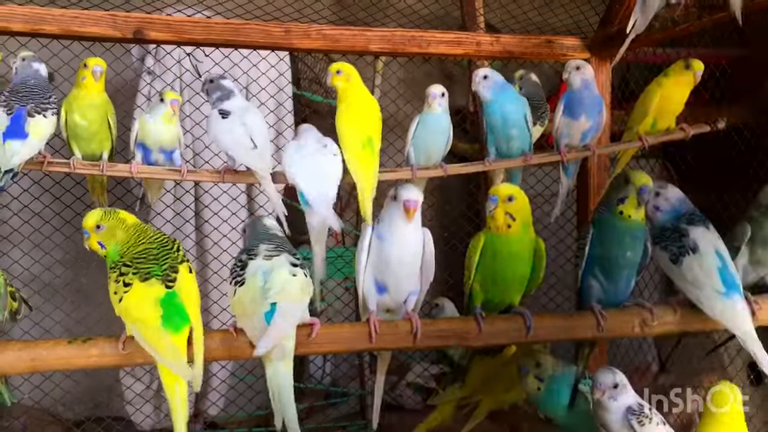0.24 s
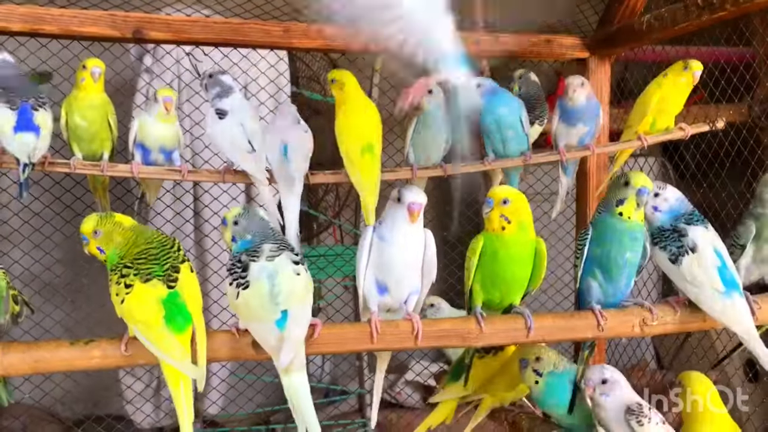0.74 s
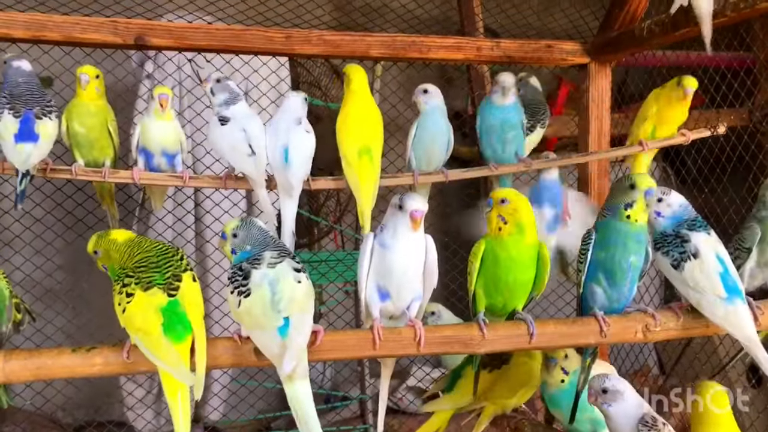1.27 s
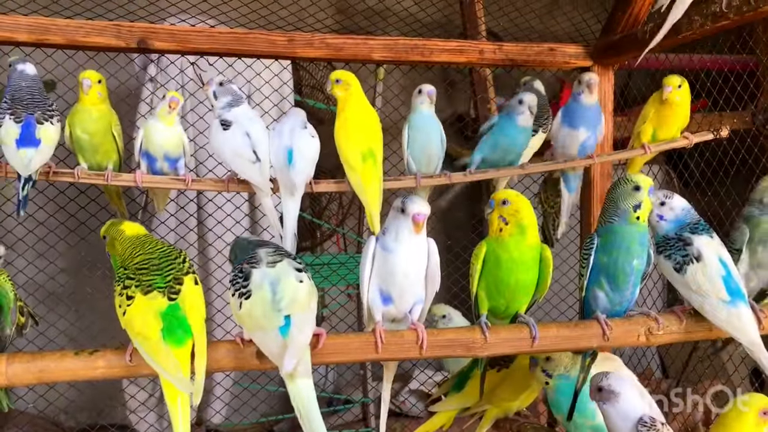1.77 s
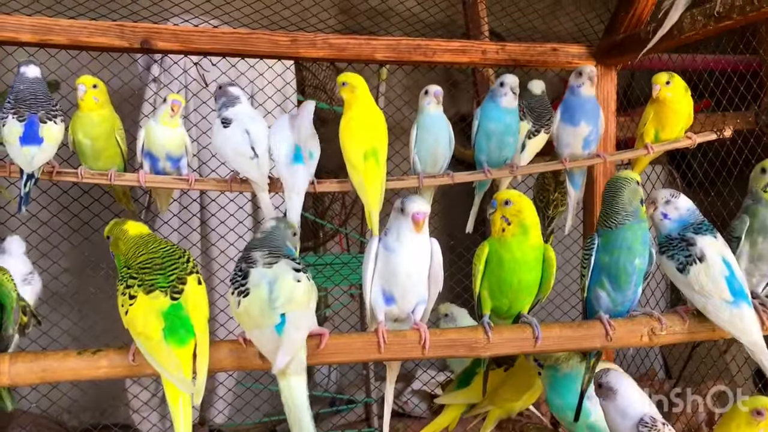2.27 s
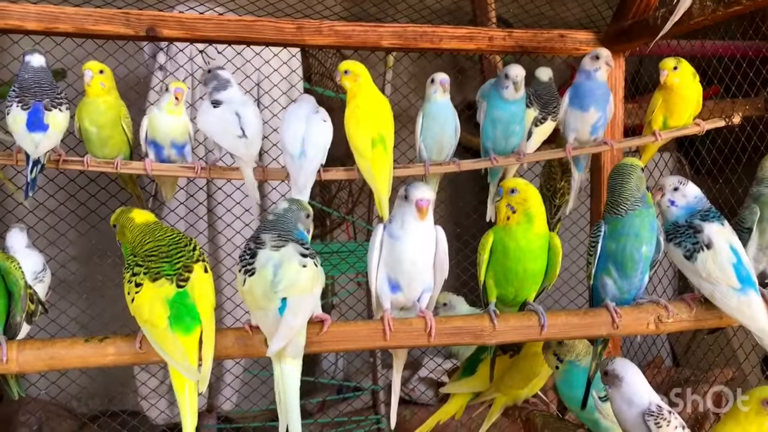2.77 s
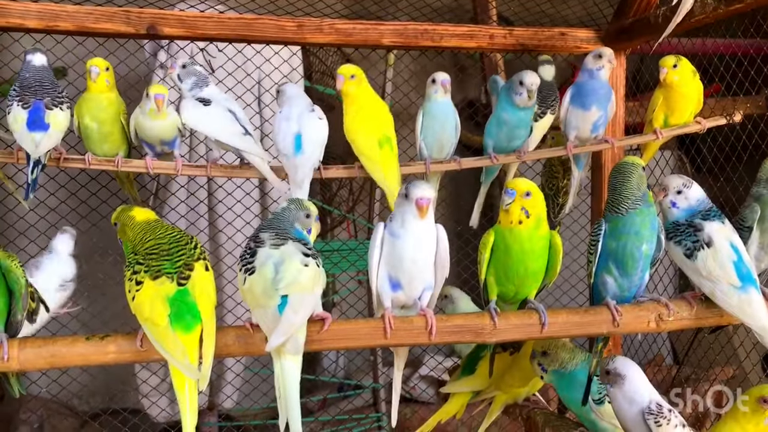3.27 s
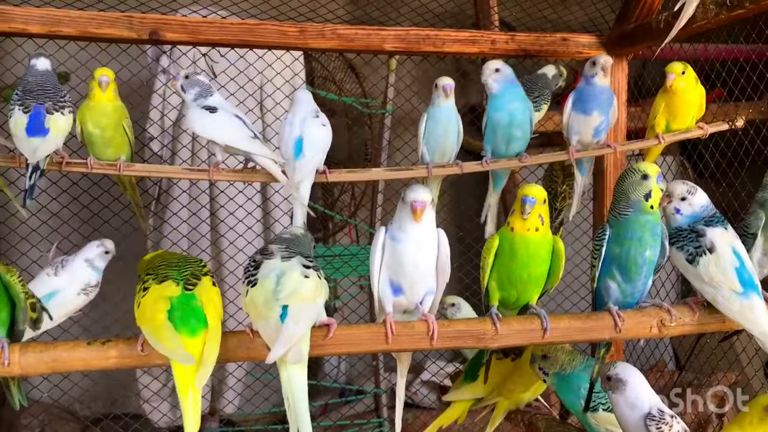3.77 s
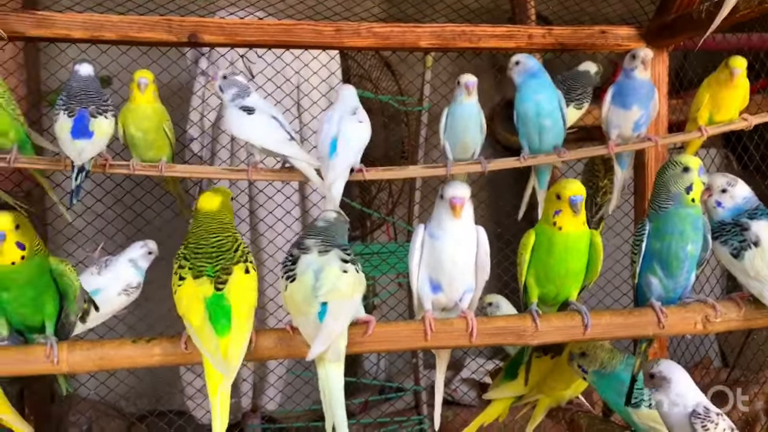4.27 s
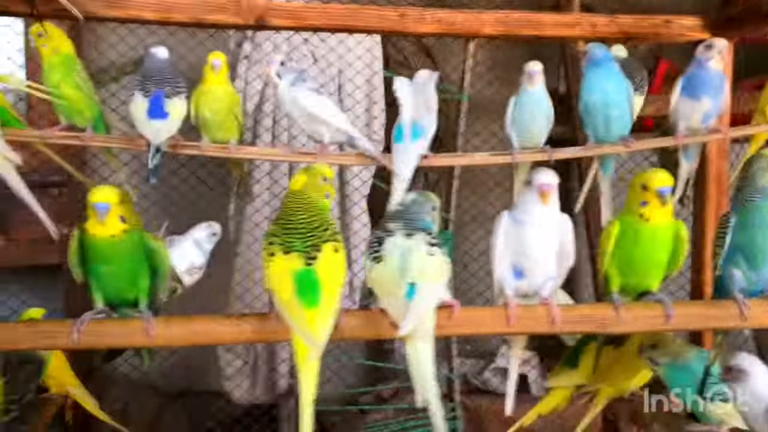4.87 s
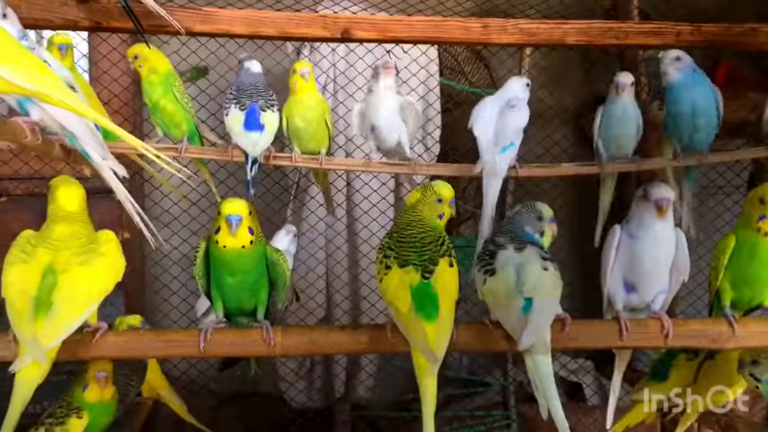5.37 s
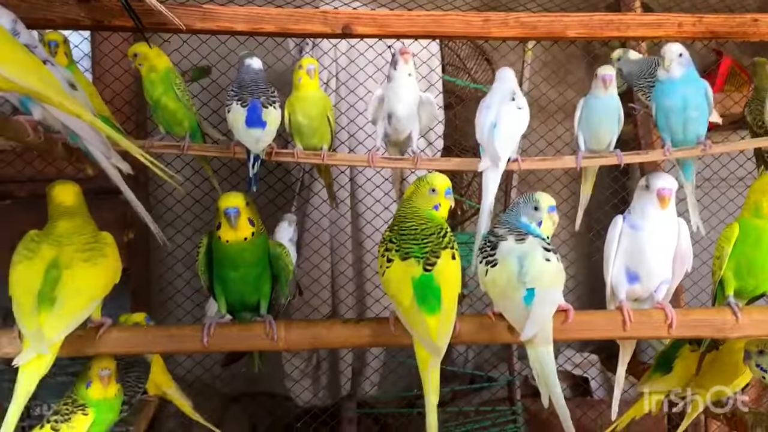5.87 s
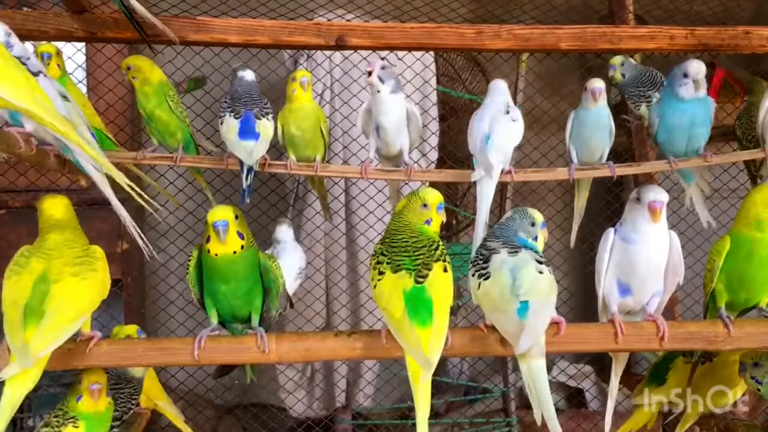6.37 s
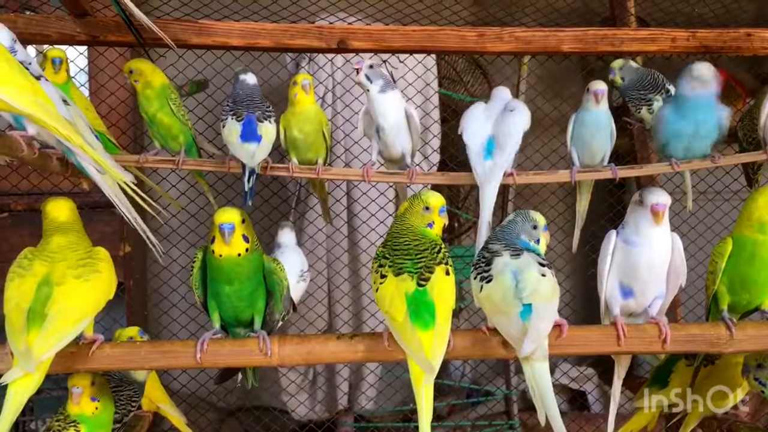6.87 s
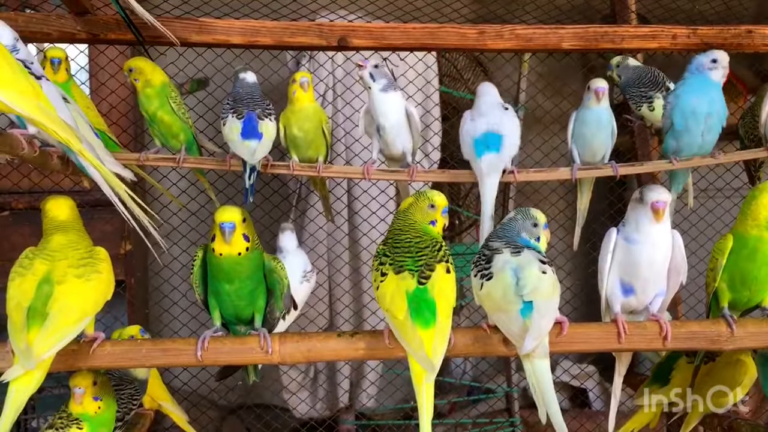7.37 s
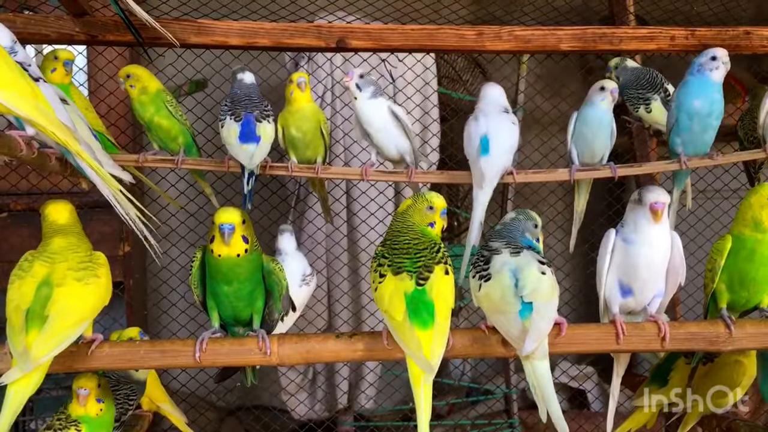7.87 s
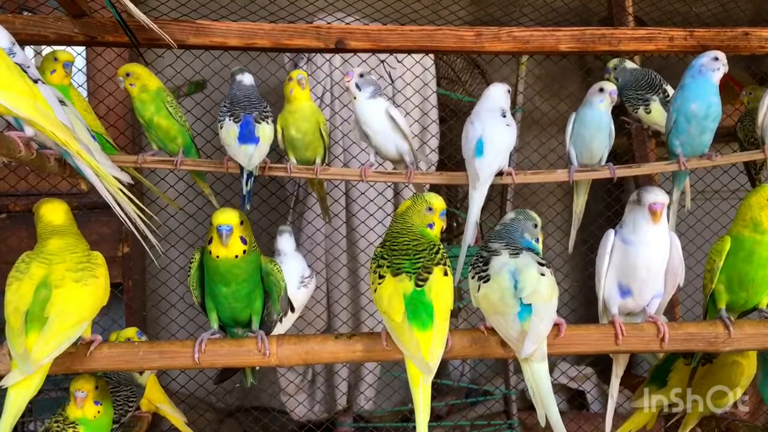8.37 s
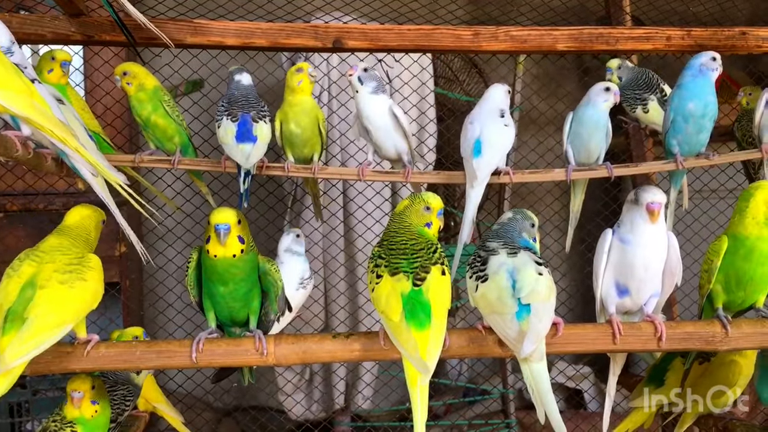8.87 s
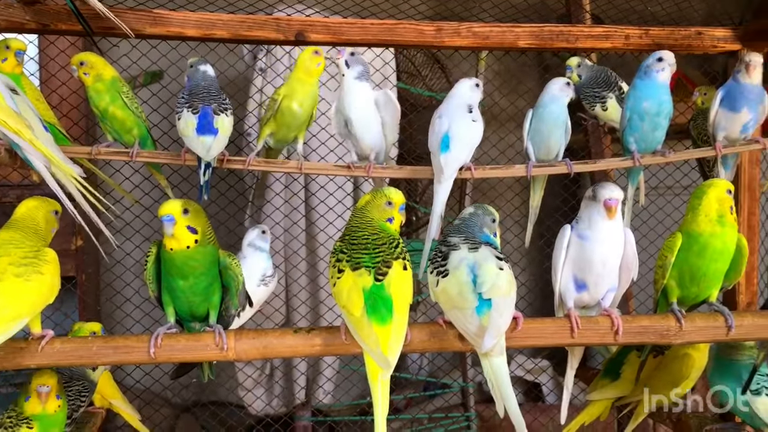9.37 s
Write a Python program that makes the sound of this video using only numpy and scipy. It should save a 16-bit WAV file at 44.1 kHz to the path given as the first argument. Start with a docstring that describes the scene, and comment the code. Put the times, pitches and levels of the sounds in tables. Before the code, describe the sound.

Close budgerigar warbles, a rasping squawk and rapid chatter mix with feathery wing flaps, strongest near five seconds, before the flock goes nearly still.

```python
"""Budgerigars in a small wire aviary, heard close up: warbled chirps, two whistles, a screech, scolding notes.
The voices are harmonics of gliding pitches, shaped by throat resonances and roughened by random shaking.
Wings are noise pulsed by the beat: pushed air, whoosh and feather swish. Claws and wing tips tick on wood
and wire as short noise bursts. The flock settles later on, while far birds chatter and coo faintly
over a low outdoor hum of coloured noise."""
import sys
import numpy as np
from scipy import signal
from scipy.fft import rfft, irfft, next_fast_len
from scipy.io import wavfile

SR = 44100
rng = np.random.default_rng(int(sys.argv[2]) if len(sys.argv) > 2 else 0)


def generate_wav(sig):
    """Save sig (samples, or channels by samples) to the path in sys.argv[1] as 16-bit PCM at SR."""
    pcm = np.round(np.clip(np.atleast_2d(sig).T, -1, 1) * 32767).astype(np.int16)
    wavfile.write(sys.argv[1], SR, pcm)


N = 424241
TIME = np.arange(N) / SR  # s

# throat and beak resonance of the scolds, also colouring the hiss of warbles: freq_hz, relative_db
SCOLD_RESONANCE = [(2800, -12), (4000, 4), (5800, 0.5), (7000, -8), (9000, -3.5), (10500, -26),
                   (15000, -31)]
# noise colour of feathers rubbing: freq_hz, relative_db (per Hz)
FEATHER_COLOUR = [(800, -26), (4600, -5.5), (6500, 3), (11000, -2), (15500, -16)]
# noise colour of hard little contacts: freq_hz, relative_db (per Hz)
CONTACT_COLOUR = [(900, -1.5), (6500, -3.5), (15500, -8)]
# bouts of wing beating: start_s, length_s, build_up_s, whoosh_db, swish_db, air_db
WING_BOUTS = [(-0.02, 0.67, .02, -47, -55, -41.5), (0.678, 0.54, 0.041, -45, -51, -42),
              (1.21, 0.36, 0.021, -51, -55.5, -47), (1.58, 1.04, .023, -57.5, -64.5, -60),
              (3.196, 0.43, 0.24, -59, -59, -53), (3.502, 0.47, 0.016, -43, -53.5, -39),
              (4.037, 0.065, 0.047, -45.5, -53.5, -65), (4.5, 0.28, 0.058, -51.5, -43, -50.5),
              (4.614, 0.075, 0.034, -38.5, -36, -34), (4.797, 0.27, .01, -36.5, -31, -39.5),
              (4.851, 0.28, .17, -39, -35, -37), (5.183, 1.09, .023, -53, -59, -49),
              (7.708, 0.12, .023, -55.5, -59, -47)]


def undb(db):
    """Decibels to gain."""
    return 10 ** (np.asarray(db) / 20)


def unit(x):
    """Scale to rms 1."""
    return x / np.sqrt(np.mean(x ** 2))


def response(points, hz):
    """Gain of a (Hz, dB) spectrum at the given frequencies, joined by lines over log frequency."""
    freq_hz, level_db = np.transpose(points)
    return undb(np.interp(np.log(np.maximum(hz, 1)), np.log(freq_hz), level_db))


def colour(x, points):
    """Filter by a (Hz, dB) spectrum and scale to rms 1."""
    size = next_fast_len(len(x))
    hz = np.arange(size // 2 + 1) * SR / size
    filtered = irfft(rfft(x, size) * response(points, hz), size)
    return unit(filtered[:len(x)])


def wander(t, rate):
    """Random values, rate a second, joined by lines; spread near 1."""
    knots = (t - t[0]) * rate
    values = rng.standard_normal(len(t) // 4 + 2)
    return np.sqrt(1.5) * np.interp(knots, np.arange(len(values)), values)


def span(start, end):
    """Sample times between two moments in seconds."""
    return np.arange(int(start * SR), int(end * SR)) / SR


def add(out, t, x):
    """Mix x in at its sample times, dropping what falls outside the scene."""
    i = np.rint(t * SR).astype(int)
    inside = (i >= 0) & (i < N)
    out[i[inside]] += x[inside]


def far_call(middle, length, hz, db, waver, grain_db=6, echo_s=0.09):
    """A wavering call, broken into syllables the more it wavers, trailed by its many reflections."""
    out = np.zeros(N)
    t = span(middle - length / 2, middle + length / 2)
    pitch = hz * (1 + waver * wander(t, 220))
    tone = np.sin(2 * np.pi * np.cumsum(pitch) / SR)
    syllables = undb(grain_db * min(waver / 0.15, 1) * wander(t, 59.2))
    call = tone * syllables * signal.windows.tukey(len(t), .5)
    age = span(0, 0.27)
    echoes = rng.standard_normal(len(age)) * np.exp(-age / echo_s)
    heard = signal.fftconvolve(call, echoes / np.linalg.norm(echoes))
    add(out, t[0] + np.arange(len(heard)) / SR, unit(heard) * undb(db) / 2)
    return out


def distance(hum_db=-54, swell_db=1.7):
    """Far birds over the outdoor hum, noise whose five bands from low to high swell and ebb separately."""
    # outdoor noise colour: freq_hz, relative_db (per Hz)
    hum_colour = [(22, -34), (49, 4), (469, -16), (2170, -22), (15500, -44.5)]
    # far chatter, held whistles and one low coo: middle_s, length_s, pitch_hz, level_db (before halving),
    # waver (share of the pitch)
    calls = [(2.603, 0.21, 3110, -56.5, 0.082), (3.901, .36, 3313, -51.5, 0.0042),
             (7.167, 0.19, 2219, -61, 0.033), (8.16, 0.27, 482.5, -51.5, 0.051),
             (8.362, .5, 2665, -58, 0.13), (8.647, 0.21, 2860, -55.5, .17), (8.83, 0.19, 3050, -52, .2)]
    hum = colour(rng.standard_normal(N), hum_colour) * undb(hum_db)
    below = []
    for split_hz in (400, 1000, 2200, 4500):
        lowpass = signal.butter(2, split_hz, fs=SR, output="sos")
        below.append(signal.sosfiltfilt(lowpass, hum))
    bands = np.diff([np.zeros(N), *below, hum], axis=0)
    swelling_hum = sum(band * undb(swell_db * wander(TIME, 6.1)) for band in bands)
    return swelling_hum + sum(far_call(*row) for row in calls)


def aviary(x, wet_db, t60_s=0.42, early_db=5, early_s=0.02):
    """Walls and roof answer after a moment with a dense early cluster and a short tail."""
    age = span(0, .8)
    build_up = np.minimum(age / 0.0091, 1)
    decay = np.exp(-np.log(1000) * age / t60_s)  # down 60 dB at t60_s
    early = 1 + undb(early_db) * np.exp(-age / early_s)
    reflections = rng.standard_normal(len(age)) * decay * early * build_up
    tail = colour(reflections, [(6500, 1.0), (16000, -8.5)])
    return x + undb(wet_db) * signal.fftconvolve(x, tail / np.sqrt(len(age)))[:N]


def ticks(decay_s=0.0039, ring_growth=1.42, scrape_s=0.025, scrape_db=-21, gain_db=-1):
    """A sharp contact with a faint scrape that outlasts it; the duller the contact, the longer it lasts."""
    # claws and wing tips on perch and wire: start_s, peak_db (before gain_db),
    # tilt_db (per octave: wood is dull, wire bright)
    contacts = [(0.1033, -15.5, 0), (0.894, -19.5, 3.5), (1.004, -21, 3.5), (1.2033, -25, 2),
                (3.4978, -27, 1), (6.1983, -27.5, 1.5), (6.658, -33, -3.5), (7.898, -33.5, -1.5)]
    out = np.zeros(N)
    for start, db, tilt_db in contacts:
        t = span(start, start + 0.0406)
        age = t - t[0]
        struck = [(hz, level + tilt_db * np.log2(hz)) for hz, level in CONTACT_COLOUR]
        contact = np.exp(-age / (decay_s * ring_growth ** -tilt_db))
        scrape = undb(scrape_db) * np.exp(-age / scrape_s)
        tick = colour(rng.standard_normal(len(t)), struck) * (contact + scrape)
        add(out, t, tick / np.abs(tick).max() * undb(db + gain_db))
    return out


def bouts(levels_db, release_s, rest_db):
    """Level in dB of all wing bouts together: each builds up, holds and dies away over a restless floor."""
    power = undb(rest_db + 2.56 * wander(TIME, 11)) ** 2
    for (start, length, build_s, *_), db in zip(WING_BOUTS, levels_db):
        attack = np.clip((TIME - start) / build_s, 0, 1)
        release = np.exp(-np.clip((TIME - start - length) / release_s, 0, 20))
        power = power + (undb(db) * attack * release) ** 2
    return 10 * np.log10(power)


def wings(beat_hz=21, swish_depth_db=2, whoosh_depth_db=2.0, grain_db=2, snap_db=-12, slap_db=-7):
    """Every stroke shoves air, whooshes, rubs the feathers over each other and flicks their tips."""
    # noise colours of the pushed air and of the whoosh: freq_hz, relative_db (per Hz)
    air_colour = [(22, -33), (42, -3), (66, 4.5), (160, -9.5), (600, -55)]
    whoosh_colour = [(70, -12), (140, 3.5), (800, -3.5), (3500, -11), (15000, -46.5)]
    # the perched flock never keeps quite still: whoosh_db, swish_db, air_db
    fidget_db = (-65, -72.5, -62.5)
    releases_s = 0.052, 0.039, 0.1  # whoosh, swish, air

    _, _, _, *levels = np.transpose(WING_BOUTS)
    whoosh_db, swish_db, air_db = map(bouts, levels, releases_s, fidget_db)
    beat = 2 * np.pi * np.cumsum(beat_hz * (1 + .12 * wander(TIME, 11))) / SR
    stroke = np.sin(beat) + .5 * np.sin(2 * beat) + .5 * wander(TIME, 45)  # fast rise, slower fall
    air = colour(rng.standard_normal(N) * undb(2 * stroke), air_colour)

    # feather tips flick mostly on the downstroke: a dull slap and about a millisecond of crackle each
    flicks = (rng.random(N) < 110 * undb(5 * stroke) / SR) * rng.random(N) ** 2
    slaps = unit(flicks * rng.choice([-1, 1], N))
    crackle_decay = np.exp(-1 / (0.00069 * SR))
    crackle = signal.lfilter([1], [1, -crackle_decay], flicks) * rng.standard_normal(N)

    rush = unit(rng.standard_normal(N) * undb(whoosh_depth_db * stroke))
    whoosh = colour(rush + undb(slap_db) * slaps, whoosh_colour)
    barbs = rng.standard_normal(N) * undb(grain_db * wander(TIME, 1300))
    swish = colour(barbs * undb(swish_depth_db * stroke), FEATHER_COLOUR)
    # the crackle sits relative to the midpoint of whoosh and swish
    snaps = colour(crackle, CONTACT_COLOUR) * undb(snap_db + (whoosh_db + swish_db) / 2)
    return air * undb(air_db) + whoosh * undb(whoosh_db) + swish * undb(swish_db) + snaps


def strokes(attack_s=0.0033, clap_s=0.0084, rattle_s=0.0092, rattle_db=-3.0, grain_db=4):
    """On a hard downstroke the wing claps the air and its quills rattle past each other."""
    # hard downstrokes close by: start_s, clap_db
    downstrokes = [(3.524, -33.5), (3.585, -31.5), (3.624, -34.5), (3.674, -39.5), (3.988, -40),
                   (4.665, -31), (4.799, -29), (4.885, -25.5), (4.916, -25.5), (4.938, -29.5), (4.975, -26),
                   (5.06, -30)]
    # noise colour of the clap of air: freq_hz, relative_db (per Hz)
    clap_colour = [(40, -23), (200, 4), (1000, -5), (15500, -24)]
    out = np.zeros(N)
    for start, clap_db in downstrokes:
        t = span(start, start + 0.036)
        age = t - t[0]
        clap = clap_colour, clap_db, clap_s
        rattle = FEATHER_COLOUR, clap_db + rattle_db, rattle_s
        for spectrum, db, decay_s in (clap, rattle):
            decay = np.exp(-np.maximum(age - attack_s, 0) / decay_s)
            envelope = np.minimum(age / attack_s, 1) * decay
            grains = rng.standard_normal(len(t)) * undb(grain_db * wander(t, 742))
            add(out, t, colour(grains, spectrum) * envelope * undb(db))
    return out


def syrinx(hz, throat, slope_db, count=8):
    """Harmonics of a gliding pitch, changing by slope_db an octave and weighted by the throat; rms near 1."""
    k = np.arange(1, count + 1)[:, None]
    audible = k * hz < SR / 2
    gains = response(throat, k * hz) * undb(slope_db * np.log2(k)) * audible
    phase = 2 * np.pi * np.cumsum(hz) / SR
    return (gains * np.sin(k * phase)).sum(axis=0) / np.sqrt((gains ** 2).sum(axis=0) / 2)


def warble(t, hz, db, hoarse, slope_db, jitter, shimmer, hiss_db=-25):
    """A gliding call: hoarseness shakes its pitch and level, and a little hiss rides on the overtones."""
    # throat and beak resonance: freq_hz, relative_db
    throat = [(1400, 1), (3500, 10.5), (4400, -2), (7000, -16), (11000, -35.5)]
    hz = hz * (1 + jitter * hoarse * wander(t, 2600))
    loud = undb(db + shimmer * np.sqrt(hoarse) * wander(t, 350))
    hiss = colour(rng.standard_normal(len(t)), SCOLD_RESONANCE) * undb(hiss_db) * np.sqrt(hoarse)
    return (syrinx(hz, throat, slope_db) + hiss) * loud * signal.windows.tukey(len(t), .08)


def screech(depth=0.11, settle_s=.558, chop_db=13, late_chop_db=4):
    """A rasping squawk in two swelling pushes: a fast pitch flutter in hard pulses that settles on a clean tone."""
    # the two pushes: start_s, end_s, final_level_db
    pushes = [(0.4625, 0.497, -12), (0.497, 0.561, -14.5)]
    # throat and beak resonance: freq_hz, relative_db
    throat = [(1800, -18.5), (3700, -10.5), (4600, -11.5), (6500, 0), (10000, -18.5), (15000, -25)]
    attack_s, release_s, swell_db_per_s = 0.0048, 0.0046, 235.5
    out = np.zeros(N)
    t = span(pushes[0][0], pushes[-1][1] + 2 * release_s)
    effort = np.zeros(len(t))
    for start, end, db in pushes:
        attack = np.clip((t - start) / attack_s, 0, 1)
        swell = undb(db - swell_db_per_s * np.maximum(end - t, 0))
        release = np.exp(-np.maximum(t - end, 0) / release_s)
        effort += attack * swell * release

    flutter_hz = 157 * (1 + .07 * wander(t, 120))
    cycle = 2 * np.pi * np.cumsum(flutter_hz) / SR
    buzz = np.clip((settle_s - t) / 0.0022, 0, 1)  # 1 while rasping, 0 once clean
    early = np.interp(t, [.499, .508], [1, 0])
    rasp = .075 * wander(t, 2200) * (0.93 + early / 2)
    hz = 3320 * (1 + buzz * (depth * np.sin(cycle) + rasp))
    gap_db = (late_chop_db + early * chop_db) * (1 + np.cos(cycle)) / 2  # loudest as the pitch falls
    pulses = undb(buzz * (2 * wander(t, 1204) - gap_db))
    add(out, t, syrinx(hz, throat, slope_db=-1.0) * effort * pulses)
    return out


def scolds(length=0.0194, arch=1.108, overshoot=0.201, kick_at=0.278, kick_width=0.121, fade=0.55):
    """Each note is one quick squeeze, arching up and back; a forced one overshoots and rasps early on."""
    # short arched notes: start_s, top_hz (of the arch, before overshoot), level_db,
    # force (0 = clear, 1 or more = harsh)
    notes = [(1.422, 2973, -18, 0.065), (1.516, 2280, -32, 0.057), (1.560, 2520, -29.5, 0.12),
             (1.608, 2450, -28, 0.14), (1.658, 2507, -25.5, 0.15), (1.707, 2350, -25, .2),
             (1.759, 2154, -23.5, 1), (1.812, 2050, -21.5, 1.2), (1.861, 1748, -31.5, 0.25),
             (1.922, 1670, -26, 0.15), (1.983, 1792, -27, 0.04), (2.059, 2008, -24.5, 0.99),
             (2.271, 2035, -34, 0.73), (3.78, 2450, -25, 2.14)]
    rasp, forced_rasp = .022, .09  # shares of the pitch
    out = np.zeros(N)
    for start, top_hz, db, force in notes:
        t = span(start, start + length)
        u = np.linspace(0, 1, len(t))  # progress through the note
        kick = force * np.exp(-((u - kick_at) / kick_width) ** 2)
        rough = (rasp * (1 + force) + forced_rasp * kick) * wander(t, 2442)
        hz = top_hz * (1 - arch * (u - .55) ** 2 + overshoot * kick) * (1 + rough)
        loud = undb(db + 1.4 * wander(t, 517)) * signal.windows.tukey(len(t), fade)
        add(out, t, syrinx(hz, SCOLD_RESONANCE, slope_db=-3.5) * loud)
    return out


def whistles():
    """Each whistle dips, scoops up to its pitch, holds it and breaks into a hoarse fall."""
    # soft low whistles: start_s, held_hz, level_db
    calls = [(-0.014, 2265, -31.5), (5.348, 2228, -32)]
    # their common course: age_s, bend (share of the held pitch), level_db (added to the call's)
    course = [(0, 1, -20), (.013, 0.77, -7), (.034, .88, -1), (.051, 1, 0.5), (.096, 0.97, -2),
              (.111, 0.52, -8)]
    out = np.zeros(N)
    ages, *controls = np.transpose(course)
    for start, held_hz, db in calls:
        t = span(start, start + ages[-1])
        bend, level_db = (np.interp(t - start, ages, control) for control in controls)
        hoarse = np.clip(2 * (1 - bend), .2, 1)
        call = warble(t, held_hz * bend, db + level_db, hoarse, slope_db=-12.0, jitter=0.13, shimmer=7.0)
        add(out, t, call)
    return out


def chirps(slope_db=0.5, break_hz=2780):
    """Each contact chirp is one unbroken warble: the pitch swoops between clear crests and hoarse troughs."""
    # one chirp to a row, as turning points of the voice: time_s, pitch_hz, level_db
    chirp_turns = [
        [(.274, 4020, -43.5), (.286, 3560, -24.5), (.293, 2050, -41.5), (.301, 3800, -41.5),
         (.315, 1850, -34.5), (.326, 3600, -32), (.345, 3200, -26.5), (.353, 2200, -38)],
        [(1.68, 3400, -29), (1.691, 3190, -33), (1.698, 1700, -32), (1.707, 2500, -36.5), (1.733, 2300, -31),
         (1.747, 1358, -40.5), (1.783, 2450, -24.5)],
        [(2.948, 3600, -46), (2.962, 2200, -43.5), (2.985, 3250, -37.5), (3.002, 3200, -27), (3.024, 1450, -42),
         (3.053, 3500, -30.5), (3.076, 2600, -33), (3.095, 2400, -38.5)],
        [(4.997, 2800, -19), (5.007, 3450, -21.5), (5.016, 2300, -37), (5.041, 3750, -18), (5.05, 2700, -30.5),
         (5.069, 3650, -19), (5.083, 2400, -43.5), (5.093, 3150, -22.5), (5.108, 2600, -25.5),
         (5.12, 3600, -22)],
        [(5.51, 3200, -33), (5.523, 4000, -22), (5.539, 2150, -33), (5.564, 3400, -18.5), (5.577, 3250, -20),
         (5.599, 1450, -40.5), (5.627, 3600, -24), (5.652, 2550, -32), (5.672, 1900, -47)],
    ]
    out = np.zeros(N)
    for turns in chirp_turns:
        times, turn_hz, turn_db = np.transpose(turns)
        t = span(times[0], times[-1])
        order = np.arange(len(times))
        place = np.interp(t, times, order)
        eased = place - np.sin(2 * np.pi * place) / (2 * np.pi)  # pitch lingers at each turn
        hz = np.interp(eased, order, turn_hz)
        db = np.interp(place, order, turn_db)
        hoarse = np.clip((break_hz - hz) / 700, .14, 1)  # the voice roughens below break_hz
        add(out, t, warble(t, hz, db, hoarse, slope_db, jitter=0.07, shimmer=3.9))
    return out


def scene():
    """Voices and wings in the aviary, over the distance."""
    calls = aviary(chirps() + whistles(), wet_db=-7.0)
    harsh_calls = aviary(scolds() + screech(), wet_db=-10.5)
    movement = aviary(wings() + strokes() + ticks(), wet_db=-13.0)
    return (calls + harsh_calls + movement + distance())[None]


def record(dry, top_hz=15900):
    """The recorder cuts the top with a steep low-pass."""
    return signal.sosfilt(signal.ellip(10, .2, 70, top_hz, fs=SR, output="sos"), dry)


dry = scene()
out = record(dry)
generate_wav(out)
```